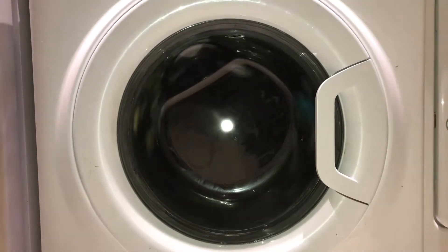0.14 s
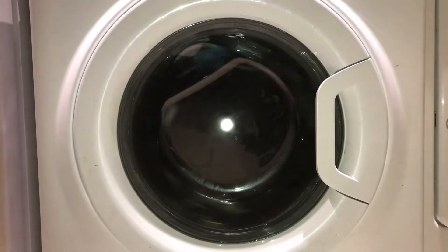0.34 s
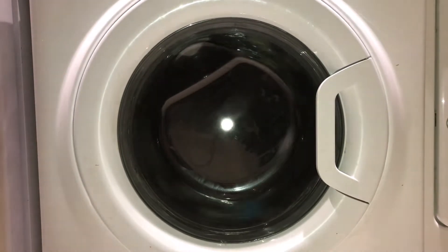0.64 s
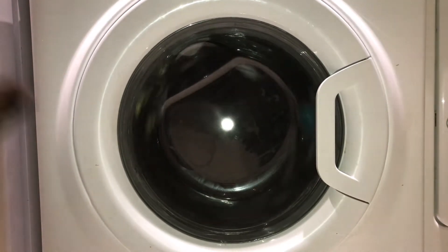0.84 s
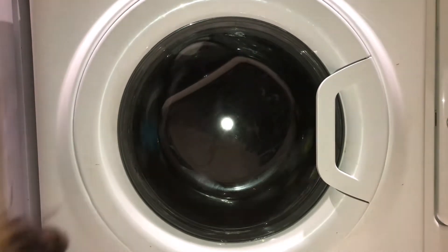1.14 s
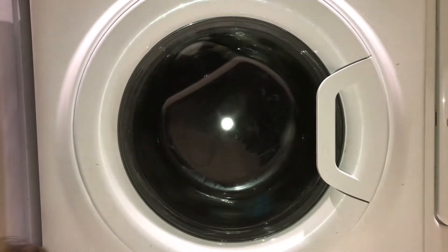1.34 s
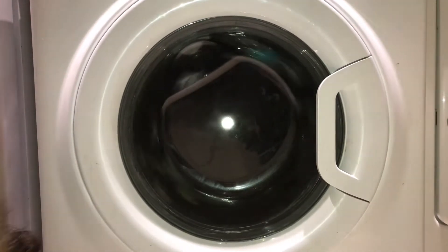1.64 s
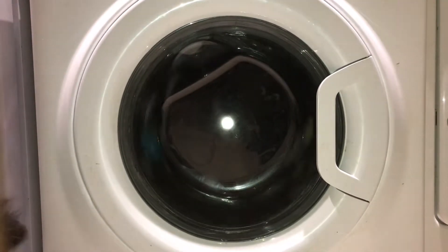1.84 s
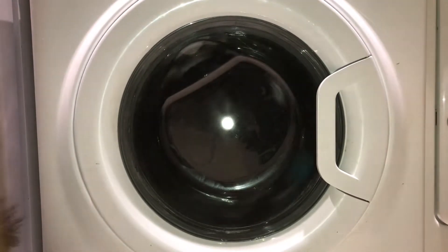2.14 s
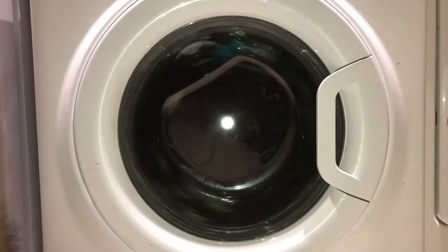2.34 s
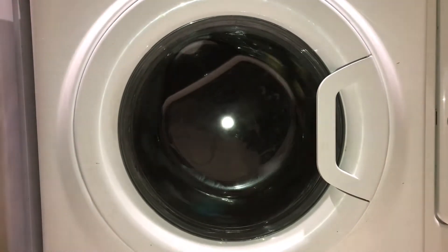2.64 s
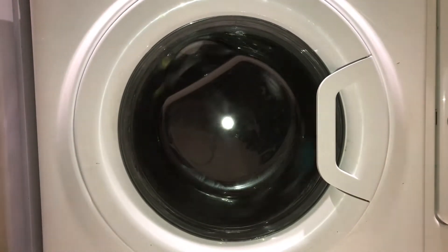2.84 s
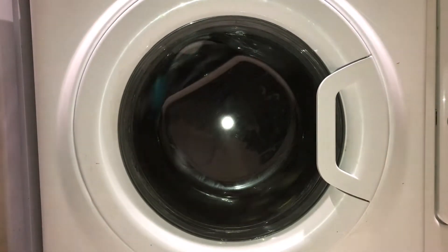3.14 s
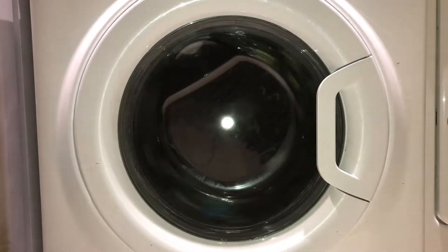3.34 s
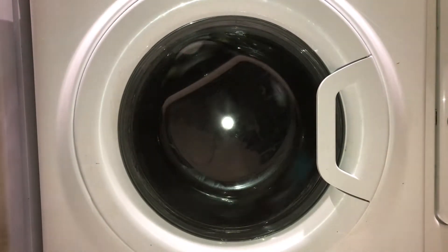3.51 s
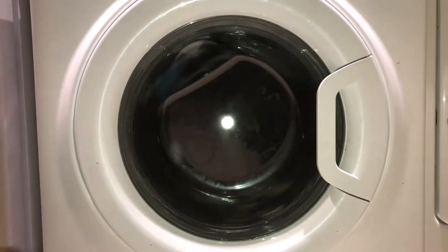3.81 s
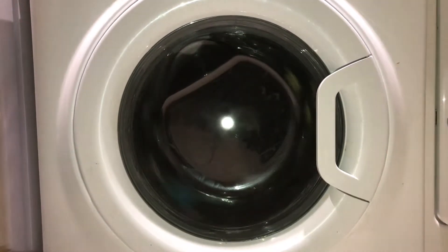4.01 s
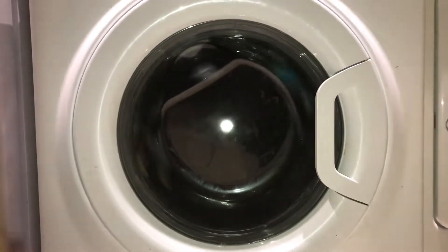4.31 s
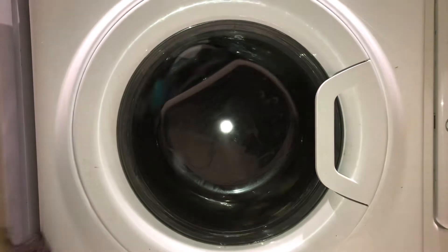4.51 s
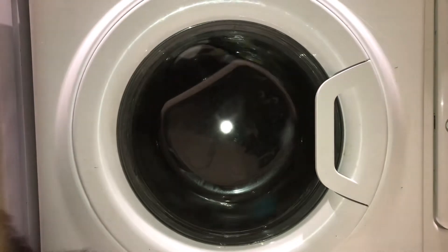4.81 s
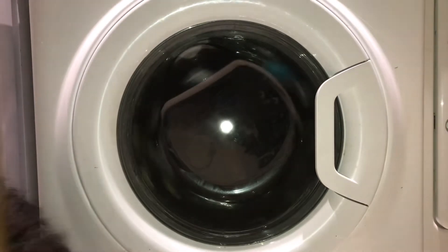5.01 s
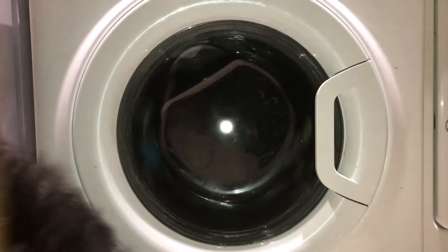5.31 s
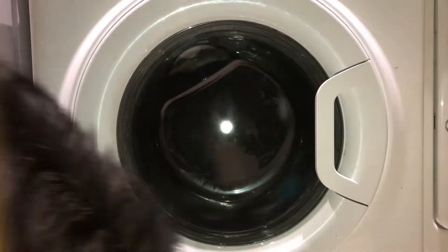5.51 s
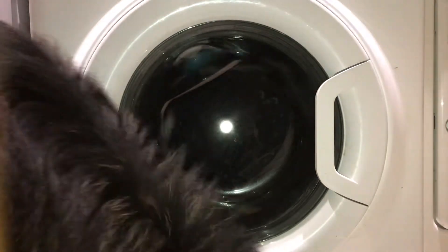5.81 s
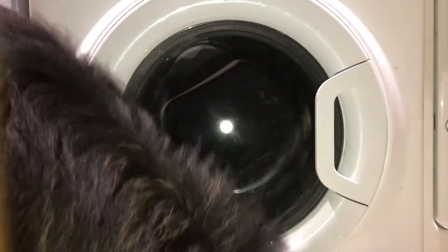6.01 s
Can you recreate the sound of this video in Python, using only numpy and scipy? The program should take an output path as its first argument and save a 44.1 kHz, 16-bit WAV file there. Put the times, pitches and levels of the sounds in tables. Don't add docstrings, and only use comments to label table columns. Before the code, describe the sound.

A front-loading washer turns steadily with a low, quiet watery rush, motor hum and thin whine, a tiny squeak at the start and a few soft ticks. After about two seconds a dog walks by close to the microphone: claws click sharply, paws thud and knock on a hard hollow floor, a little metal rings, and fur and pads scrape. Small hard room, short echo.

```python
import sys
import numpy as np
from scipy import signal
from scipy.fft import rfft, irfft, next_fast_len
from scipy.io import wavfile
from scipy.ndimage import uniform_filter1d, map_coordinates

SR = 44100
rng = np.random.default_rng(int(sys.argv[2]) if len(sys.argv) > 2 else 0)


def digitize_waveform(pressure):
    field = np.atleast_2d(pressure).T
    bounded = np.clip(field, -1, 1)
    quanta = np.round(bounded * 32767).astype(np.int16)
    wavfile.write(sys.argv[1], SR, quanta)


def volts(x):
    e = np.asarray(x, float) / 20
    return 10 ** e


N = 271656


def unit(x):
    return x / np.sqrt(np.mean(x ** 2) + 1e-20)


def curves(rows):
    s, *cols = np.transpose(rows)
    return [np.interp(np.arange(N) / SR, s, c) for c in cols]


def wobble(rate):
    knots = rng.standard_normal(int(N * rate / SR) + 4)
    return map_coordinates(knots, [np.arange(N) * rate / SR])


def filtered(x, response):
    m = next_fast_len(N + SR // 2)
    return irfft(rfft(x, m) * response(np.fft.rfftfreq(m, 1 / SR)), m)[..., :N]


def peak(f, centre, width):
    return 1j * f * width / (centre * centre - f * f + 1j * f * width)


def resonant(x, modes, skirt=0):
    low, high = modes[0][0], modes[-1][0]

    def response(f):
        total = 0
        for k, (centre, width, db) in enumerate(modes):
            total = total + (-1) ** k * volts(db) * peak(f, centre, width)
        return total * peak(f, np.sqrt(low * high), 1.5 * (high - low)) ** skirt

    return filtered(x, response)


def narrow(hz, width_hz):
    def response(f):
        damping = (f * width_hz) ** 2
        return damping / ((hz * hz - f * f) ** 2 + damping)

    return unit(filtered(rng.standard_normal(N), response))


def patchy(depth_db):
    z = signal.stft(rng.standard_normal(N), nperseg=512)[2]
    field = uniform_filter1d(rng.standard_normal(z.shape), 6, 0)
    field = uniform_filter1d(field, 10, 1)
    return signal.istft(z * volts(depth_db * unit(field)), nperseg=512)[1][:N]


def strokes(start, hold, db, rise_db_s, fall_db_s):
    t = np.arange(0, N + 32, 32)[:, None] / SR
    before = np.maximum(start - t, 0)
    after = np.maximum(t - start - np.abs(hold), 0)
    power = volts(db - rise_db_s * before - fall_db_s * after) ** 2
    return np.interp(np.arange(N) / SR, t[:, 0], np.sqrt(np.sum(power, axis=1)))


def struck(events, parts, decays, blow_db):
    rows, t, out = np.array(events), np.arange(SR // 2) / SR, np.zeros(N)
    at = np.round(rows[:, 0] * SR).astype(int)
    noise = unit(patchy(depth_db=.8))
    for k, (modes, decay) in enumerate(zip(parts, decays)):
        ring_s, ring_db, room_s, room_db, gain_db = decay
        blows = np.bincount(at, volts(rows[:, 1] + rows[:, 2 + k] + gain_db), N)
        rattle = volts(ring_db - 60 * t / ring_s) ** 2
        room = volts(room_db - 60 * t / room_s) ** 2 * (1 - np.exp(-t / 0.0015))
        power = signal.fftconvolve(blows ** 2, rattle + room)[:N]
        after = np.sqrt(np.abs(power)) * noise
        out += resonant(volts(blow_db) * blows + after, modes, skirt=1)
    return out


# frequency in Hz, density in dB per Hz.
RUSH_SPECTRUM = [(16, -23), (35, 2), (60, -15), (385, -6), (453, -6.5), (657, -4), (953, -10), (1830, -13),
                 (2650, -12), (3420, -15.5), (4030, -10.5), (4320, -12), (7540, -23), (13200, -28.5),
                 (14100, -25), (15500, -58)]
# centre in Hz, width in Hz, level in dB.
WHINE_BANDS = [(451, 28, -70.5), (565, 55, -68), (673, 120, -89.5), (2675, 84, -68), (4003, 73, -67.5)]
# frequency in Hz, level in dB.
HUM_LINES = [(450, -69), (565, -69.5), (663, -75), (2730, -80), (4012, -76)]
# time in seconds, pitch in Hz, level in dB.
SQUEAK_GLIDE = [
    (.04, 3120, -67),
    (.075, 3075, -64),
    (.11, 3066, -60),
    (.136, 2970, -76),
    (.17, 3010, -65),
    (.232, 3065, -66),
    (.275, 3080, -56),
    (.332, 3040, -71),
    (.4, 3050, -95),
]


def machine():
    f, level = np.transpose(RUSH_SPECTRUM)
    rush = filtered(patchy(depth_db=1.1), lambda hz: volts(
        np.interp(np.log(hz + 1), np.log(f), level, left=-120, right=-120)))
    sway_db = .3 * wobble(3.1) + 0.72 * wobble(13) + 0.97 * wobble(60)
    out = volts(-56.5 + sway_db) * unit(rush)
    for mode_hz, width_hz, db in WHINE_BANDS:
        out = out + volts(db + .8 * wobble(3.35) + 1.2 * wobble(25)) * narrow(mode_hz, width_hz)
    for hum_hz, db in HUM_LINES:
        drift = 1.5 * wobble(9 * hum_hz / 500)
        tone = np.sin(2 * np.pi * hum_hz * np.arange(N) / SR + drift)
        out = out + volts(db + 2 + 3.0 * wobble(8)) * tone
    pitch, db = curves(SQUEAK_GLIDE)
    squeak = volts(db + 3) * np.sin(2 * np.pi * np.cumsum(pitch) / SR + .9 * wobble(60))
    mate = volts(-72 + np.minimum(db + 76, 0)) * narrow(1.168 * pitch[0] / 1.025, 70)
    return out + squeak + mate


# centre in Hz, width in Hz, level in dB.
BOARD_MODES = [(50, 21, -6), (77, 8.7, 4.5), (150, 68, -5)]
# start in
# seconds, hold in seconds, level in dB.
BOARD_LOADS = [(.001, 0.056, -39), (.45, .05, -61), (1.224, 0.0092, -75), (1.49, 0.056, -57),
               (2.3, 0.077, -46), (2.725, .02, -56), (3.0, .04, -60), (3.143, .09, -48),
               (3.28, 0.0088, -31), (3.685, 0.015, -48), (3.912, 0.014, -32.5), (4.055, .02, -43.5),
               (4.147, .02, -47), (4.298, .03, -57), (4.506, 0.0099, -31.5), (4.62, 0.046, -50),
               (4.953, 0.046, -49), (5.27, 0.058, -39), (5.523, 0.011, -34), (5.7, 0.089, -48),
               (5.88, .01, -38), (6.01, 0.054, -47)]
# time in seconds, level in dB.
WEIGHT_SHIFTS = [
    (4.3, -54),
    (4.388, -65),
    (4.538, -51),
    (4.92, -55),
    (5.274, -46),
    (5.392, -40.5),
    (5.848, -47.5),
    (6.03, -54),
    (6.16, -50),
]


def boom():
    idle = volts(-60)
    load = idle + strokes(*np.transpose(BOARD_LOADS), rise_db_s=342, fall_db_s=205)
    sway = load * volts(-8.5) * unit(resonant(rng.standard_normal(N), BOARD_MODES, skirt=0.21))
    onset = np.clip((np.arange(N) / SR - 4.2) / .1, 0, 1)
    lumps = rng.standard_normal(N) * volts(4.2 * wobble(30))
    dull = unit(resonant(lumps, [(175, 23, 0), (370, 150, 0)], skirt=0.17))
    return sway + onset * volts(curves(WEIGHT_SHIFTS)[0] - 6.0) * dull


# time in
# seconds, peak in dB, pitch in Hz.
DRUM_TICKS = [(.214, -47, 4880), (.399, -39, 4150), (.398, -41, 5000), (.42, -43, 4400), (.48, -38, 1000),
              (.483, -39, 870), (.482, -44, 1250), (.485, -41, 610), (.5, -40, 1124), (.747, -35.5, 3700),
              (.747, -44, 3220), (1.257, -43, 3240), (1.664, -41, 3500), (1.664, -46, 4500),
              (.79, -48, 3600), (1.095, -44, 3600), (1.135, -44, 3600), (1.163, -47, 1950),
              (1.257, -42, 2500), (1.257, -42.5, 4020), (1.525, -45, 1800), (1.572, -38, 2820),
              (1.596, -36, 3800), (1.597, -43, 4500), (1.598, -46, 6400), (1.664, -36, 3300),
              (1.665, -36, 4050), (1.671, -35.5, 593), (1.692, -38, 585), (1.726, -45, 610)]
# time in seconds, peak in dB, pitch in Hz.
NAIL_TICKS = [(2.3743, -8.5, 8860), (2.378, -15, 5640), (2.378, -6, 3700), (2.3785, -20, 11200),
              (3.229, -25, 1370), (3.272, -23, 8500), (3.272, -12, 3960), (3.915, -35, 7700),
              (3.9272, -9, 4500), (3.93, -21, 5800), (3.939, -13.5, 2750), (3.949, -16, 1310),
              (3.964, -30, 3300), (3.985, -27, 1180), (4.8752, -11.5, 2750), (4.947, -20, 1854),
              (5.179, -21, 1800), (5.18, -25.5, 1205), (5.835, -35.5, 375), (2.7615, -27.5, 4560),
              (3.005, -29, 10100), (3.0215, -16, 4500), (3.026, -16, 5600), (3.034, -18, 4400),
              (3.173, -46, 9200), (3.859, -27, 4700), (4.3495, -18, 3300), (4.607, -22.5, 1282),
              (5.351, -40, 900), (3.51, -38, 9200), (3.528, -32.5, 3300), (3.528, -35, 4570),
              (3.565, -26.5, 4500), (3.564, -33, 8500), (3.7954, -13.5, 2375), (3.7956, -16, 3300),
              (3.7962, -11.5, 4400), (3.798, -19.5, 1400), (4.054, -20.5, 4680), (4.35, -22, 705),
              (4.3492, -20, 1327), (4.5015, -15, 1338), (4.488, -37, 15000), (4.654, -31, 14400),
              (4.662, -37, 14400), (4.762, -26, 4230), (4.762, -22, 6800), (5.19, -21, 14300),
              (5.55, -46, 14000), (5.67, -33, 14700), (5.7215, -30, 900), (5.722, -30, 1400),
              (5.725, -30.5, 359), (5.906, -12.5, 1526), (5.9059, -15, 2340), (5.906, -17, 4220),
              (6.105, -27, 12300), (6.153, -18, 14500)]
# time in seconds, peak in dB, pitch in Hz.
METAL_RINGS = [
    (1.6, -50, 2500),
    (1.5, -49, 1550),
    (2.139, -49, 1750),
    (2.378, -25.5, 3680),
    (2.377, -41, 8900),
    (2.385, -24, 1393),
    (2.385, -28, 500),
    (3.595, -29, 590),
    (3.592, -29, 1800),
    (3.93, -22, 555),
]


def ticks():
    out, t = np.zeros(N + SR), np.arange(SR // 6) / SR
    kinds = [(DRUM_TICKS, .035, .8), (NAIL_TICKS, .03, .8), (METAL_RINGS, 0.12, .2)]
    for rows, ring_s, power in kinds:
        for s, db, hz in rows:
            t60 = ring_s * (1000 / hz) ** power
            width = 2 + int(t60 * SR / 10)
            rough = unit(uniform_filter1d(rng.standard_normal(len(t)), size=width))
            ring = volts(-60 * t / t60) + volts(-15.5 - 60 * t / (t60 + 0.1)) * rough
            tone = (1 - np.exp(-t * hz)) * np.sin(2 * np.pi * hz * t)
            out[round(s * SR):][:len(t)] += volts(db + 1.5) * ring * tone
    return out[:N]


# centre in Hz, width in Hz, level in dB.
THUD_MODES = [(100, 84, -7.5), (173, 48, 1.5), (353, 122, -1.5)]
KNOCK_MODES = [(390, 157, -5), (682, 256, -2), (1000, 295, -1.5), (1347, 300, 2), (1750, 2200, -9.5)]
CLICK_MODES = [(2750, 4300, -2), (4120, 1530, 6), (4500, 780, 6), (6000, 710, -1.5)]
TICK_MODES = [(6800, 290, 5), (8700, 1500, 4.5), (10660, 3600, 1), (15400, 730, -5)]
# ring T60 in seconds, ring level in dB, room T60 in seconds,
# room level in dB, gain in dB.
CONTACT_DECAYS = [
    (0.11, -26.5, 0.32, -28, 32.5),
    (0.09, -16, 0.42, -25, 24),
    (0.02, -11.5, 0.31, -29.5, 16),
    (0.016, -16.5, 0.22, -26, 13),
]
# time in seconds, knock in dB, weight (thud over knock) in dB,
# hardness (click over knock) in dB.
PAD_CONTACTS = [(.468, -43, -3, -17), (0.477, -44.5, 7.5, -22), (.487, -46, -7, -24), (.497, -48, -11, -22),
                (0.509, -42.5, -15, -24), (.53, -41, -3, -22), (2.308, -34, 7, 3), (2.3738, -16.5, -2, 3.5),
                (2.387, -18.5, -2.5, -12), (2.686, -28, 1.5, -4.5), (2.7185, -41, 15, -5),
                (2.724, -35, 3, 3), (3.0038, -31.5, 12, 9.5), (3.033, -15, -3.5, -10), (3.23, -33, -3, -11),
                (3.244, -20.5, 5, -13), (3.267, -17, 1, -16), (3.2713, -16.5, -4, 1.5),
                (3.2865, -17.5, 2, 4), (3.299, -39, -9, -10), (3.437, -37.5, 3, -9), (3.805, -33, -3, 13),
                (3.9304, -17, -28, 6), (3.947, -14.5, -37, -20), (4.4574, -27, -9, 4),
                (5.112, -36, -13, -11), (5.721, -23, -15, -16), (3.898, -29, -12, -12),
                (3.905, -30, -7, -10)]
# as for pads, then edge (highest tick over click) in dB.
CLAW_CONTACTS = [(2.119, -55.5, 8, 9, 4), (2.206, -45, 0, 10, -8), (2.212, -46, 0, 9, -5),
                 (2.287, -36, 2.5, 0, 0), (2.316, -36, -9, 10, -9), (2.327, -48, 20, 16, 2),
                 (2.348, -53, 2, 10, 6), (2.3618, -31, 3, 4, -3), (2.364, -26.5, 7.5, 7, -10),
                 (2.379, -22, -2, 8.5, -6), (2.698, -45.5, 5, 2, 2.5), (2.705, -40, 0, 6, -7),
                 (2.7612, -49, -16, 17, 1.5), (2.9927, -27.5, 2, -2, -6), (3.009, -36, 8, 8, -8),
                 (3.0218, -18.5, 0, -0.5, -3), (3.161, -57, -9, 12, 1), (3.502, -42.5, 2, 4, 3.5),
                 (3.545, -43, 4, 13, -2.5), (3.796, -26.5, -4, 14, -5.5), (3.915, -16.5, -35, -8, -5),
                 (3.9278, -12.5, -8.5, 4, -2.5), (4.034, -29.5, -15, -1, -1), (4.5002, -24.5, -4, 1, -1),
                 (4.506, -25.5, -3, 6, -9), (4.603, -29, -4, -1, 0), (4.762, -46, -15, 21.5, 1),
                 (4.9355, -33, -18, 17, -8.5), (5.17, -41.5, -16, 14.5, 1), (5.179, -40.5, -20, 10.5, 8.5),
                 (5.187, -42, -12, 15, 3), (5.247, -26.5, 1.5, 2, -2.5), (5.317, -40, -7, 8, -7),
                 (5.349, -24, -4, -5, -3), (5.4135, -33, -17, 23, -4.5), (5.423, -27.5, -9, 3, 4),
                 (5.835, -32, -3, -4, -7), (6.105, -36, -20, -7, 6), (6.152, -41.5, -21, 9, 3)]
TILE_KNOCK_TIMES = [3.172, 3.5863, 4.349, 4.8751, 4.9351, 4.948, 5.8662, 5.9058, 5.984]
# level in dB, hollowness in dB, sharpness in dB.
TILE_KNOCKS = [
    (-20.5, 2, -9),
    (-8.5, -9.5, -12.5),
    (-11.5, -12, -8.5),
    (-7.5, -6.5, -3.5),
    (-5.5, -27, -11),
    (-29.5, -14, 3.5),
    (-28, 0.5, -1.5),
    (-2.5, -8.5, -8),
    (-11.5, -8.5, -9.5),
]
# centre in Hz, width in Hz, level in dB.
TILE_MODES = [
    [(442, 300, -8.5), (648, 113, -0.5), (900, 190, 0)],
    [(1285, 255, 4), (1520, 430, 3.5), (1713, 380, 1.5)],
    [(2280, 150, 6), (2750, 310, -0.5), (3300, 660, 2)],
    [(4400, 150, 10), (5800, 940, 0), (8500, 3800, -9)],
]
TILE_BAND_DECAYS = [
    (0.035, -11, 0.29, -20.5, 23.5),
    (0.051, -17.5, 0.27, -26.5, 22.1),
    (0.047, -15, 0.22, -22, 18.4),
    (0.016, -7.5, 0.24, -16.5, 17.7),
]
# centre in Hz, width in Hz, level in dB.
CRACK_MODES = [(1110, 630, 1.5), (2580, 1600, -7.5)]


def contacts():
    rows = [(*pad, -13) for pad in PAD_CONTACTS] + CLAW_CONTACTS
    blows = [(s, db, weight, 0, hard, hard + edge) for s, db, weight, hard, edge in rows]
    modes = (THUD_MODES, KNOCK_MODES, CLICK_MODES, TICK_MODES)
    clatter = struck(blows, modes, CONTACT_DECAYS, blow_db=2.0)
    knocks = []
    for s, (db, hollow, sharp) in zip(TILE_KNOCK_TIMES, TILE_KNOCKS):
        top_db = -7.5 + 2.6 * sharp
        knocks.append((s, db, hollow, 0, sharp, top_db))
    tile = struck(knocks, TILE_MODES, TILE_BAND_DECAYS, blow_db=2)
    at = np.round(np.array(TILE_KNOCK_TIMES) * SR).astype(int)
    crack = np.bincount(at, volts(np.array(TILE_KNOCKS)[:, 0] + 20), N)
    return clatter + tile + resonant(crack, CRACK_MODES, skirt=.6)


# start in seconds, hold in seconds, level in dB.
PAD_PUSHES = [(2.148, .17, -55), (2.382, 0.0088, -39), (2.723, .01, -68), (3.046, .01, -60),
              (3.2, .01, -45.5), (3.465, 0.12, -55), (3.612, 0.11, -43), (3.848, .01, -41.5),
              (3.924, 0.0089, -39.5), (4.11, .01, -55), (4.342, 0.18, -42.5), (4.58, .01, -37),
              (4.767, 0.022, -37), (4.894, 0.076, -35), (5.046, 0.069, -40), (5.193, 0.08, -34),
              (5.383, 0.051, -40), (5.486, 0.21, -36.5), (5.76, 0.14, -44.5), (5.956, 0.1, -39.5),
              (6.15, .01, -37.5)]
# start in seconds, hold in seconds, level in dB, brightness in dB.
FUR_BRUSHES = [(2.128, 0.15, -53.5, 1), (2.306, 0.12, -43, -11), (2.465, 0.027, -53, 2),
               (2.722, 0.0064, -50.5, -18), (2.787, 0.017, -63.5, 18), (3.048, 0.011, -41.5, -21),
               (3.135, .02, -58, 1), (3.299, 0.016, -38, -21), (3.523, .01, -50, -2),
               (3.608, 0.096, -43.5, 2), (3.799, 0.16, -43, -9), (3.939, 0.075, -35, 1.5),
               (4.092, 0.029, -48, -5), (4.216, 0.17, -53.5, 2), (4.333, 0.16, -44.5, 6.5),
               (4.518, 0.011, -36, .1), (4.577, 0.2, -43.5, 6.5), (4.753, 0.11, -40, 5.5),
               (4.936, 0.095, -42.5, -9), (5.07, 0.21, -39, 5.5), (5.332, 0.14, -36.5, 3),
               (5.52, 0.16, -37, 6.5), (5.724, 0.024, -42, 3.5), (5.833, 0.032, -46.5, 6),
               (5.892, 0.014, -52.5, 13), (6.084, 0.03, -48, 6.5), (6.15, .01, -46.5, 4)]
# centre in Hz, width in Hz, level in dB.
SCRAPE_MODES = [
    [(540, 560, -11), (1140, 318, 1.5), (1400, 580, 2.5), (1950, 1700, -4.5)],
    [(2500, 2160, -1), (3800, 1270, 4), (5620, 1800, -3.5)],
    [(6540, 3200, 0), (9570, 740, 4), (11400, 2000, -4.5), (15000, 890, -3)],
]


def scrape():
    start = np.clip((np.arange(N) / SR - 2.11) / 0.021, 0, 1)
    out, stroke_db = np.zeros(N), .7 * wobble(40)
    crackle = (rng.random(N) < 400 / SR) * rng.standard_normal(N)
    s, hold, db, bright = np.transpose(FUR_BRUSHES)
    body = strokes(*np.transpose(PAD_PUSHES), rise_db_s=168, fall_db_s=182)
    rasp = strokes(s, hold, db, rise_db_s=251, fall_db_s=206)
    hiss = strokes(s, hold, db - 11.5 + bright, rise_db_s=186, fall_db_s=150)
    for gain, modes in zip((body, rasp, hiss), SCRAPE_MODES):
        slips = patchy(depth_db=1.1) * volts(stroke_db + 1.8 * wobble(300))
        slips = slips + volts(-8) * unit(crackle)
        out += start * gain * unit(resonant(slips, modes))
    return out


# centre in Hz, width in Hz, level in dB.
PANEL_MODES = [(1400, 180, 0.5), (3700, 300, 3), (5510, 360, -2.5), (8480, 880, -3)]
# time in seconds, level in dB.
PANEL_SHAKES = [
    (2.379, -31.5),
    (3.022, -42),
    (3.273, -37.5),
    (3.93, -41),
]


def panel():
    t, t60_s = np.arange(N) / SR, 0.34
    fade = sum((t > s) * volts(db - 60 * np.abs(t - s) / t60_s) for s, db in PANEL_SHAKES)
    rattle = resonant(rng.standard_normal(N), PANEL_MODES)
    return fade * unit(resonant(rattle, PANEL_MODES))


def scene():
    mix = machine() + boom() + ticks() + contacts() + scrape() + panel()
    return np.tile(mix, (2, 1))


def low_pass(x):
    return signal.sosfilt(signal.butter(12, 16820, fs=SR, output="sos"), x)


def record(dry):
    def response(f):
        bass = 1j * f / (25 + 1j * f)
        treble = np.where(f < 15950, 1, volts(-32) * (f < 16800))
        return bass * treble

    mix = filtered(dry, response)
    return low_pass(mix)


dry = scene()
out = record(dry)
digitize_waveform(out)
```